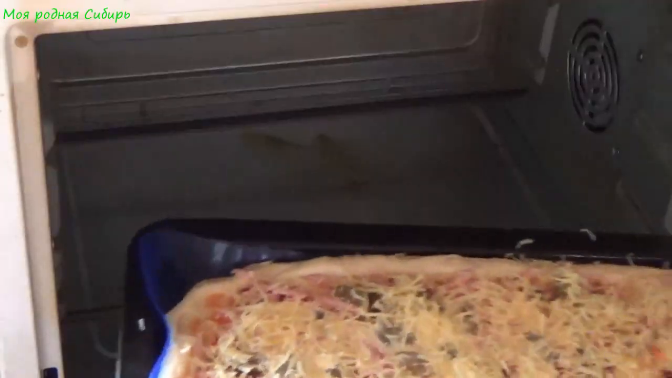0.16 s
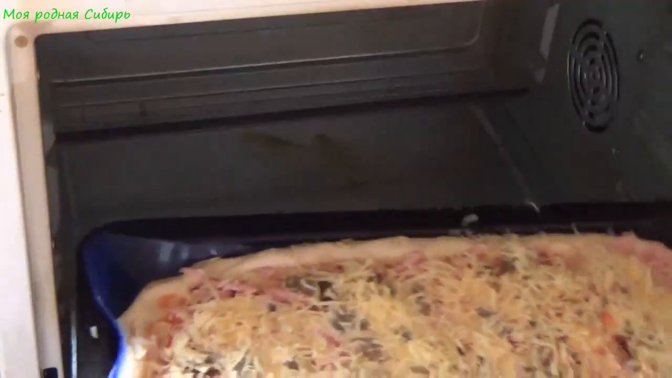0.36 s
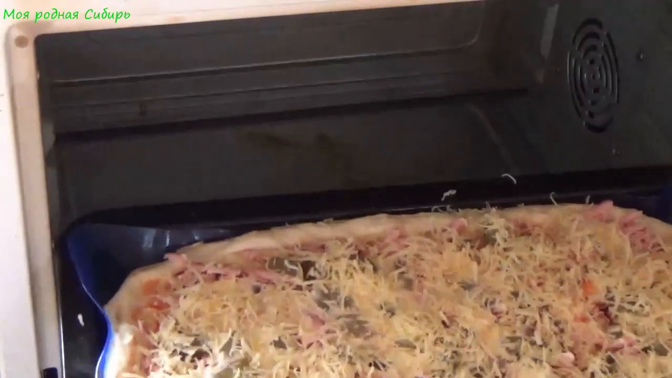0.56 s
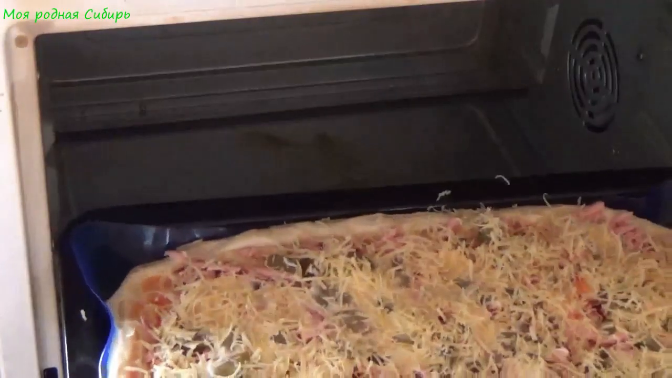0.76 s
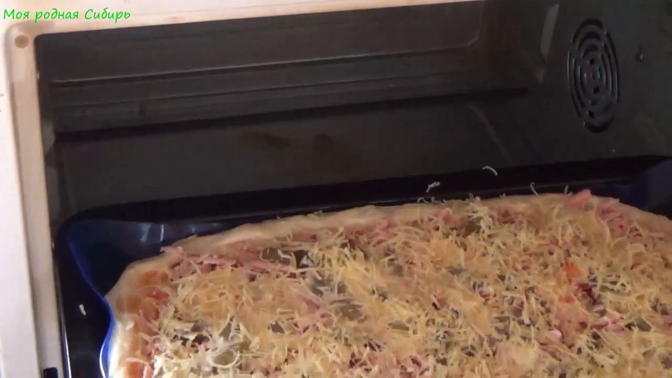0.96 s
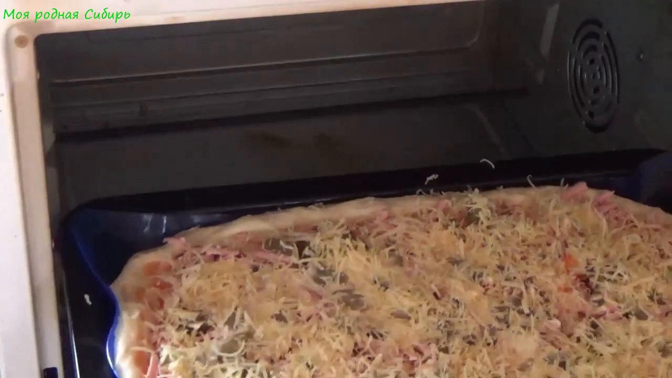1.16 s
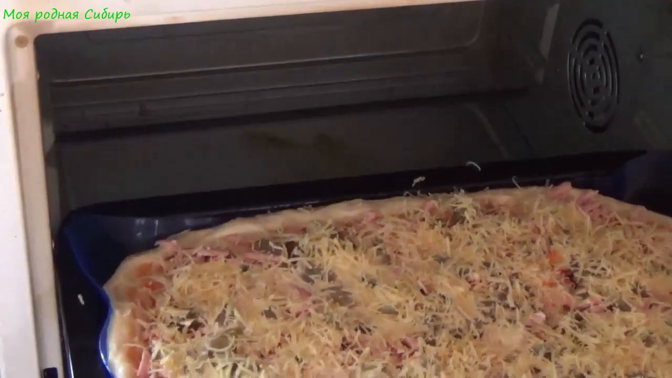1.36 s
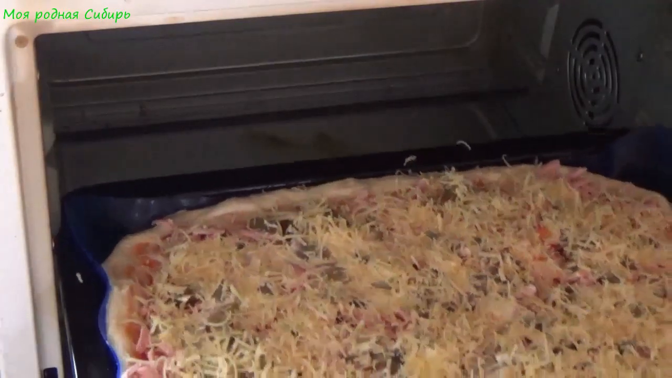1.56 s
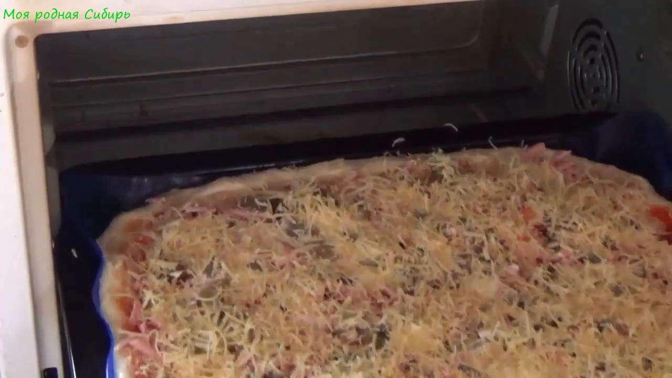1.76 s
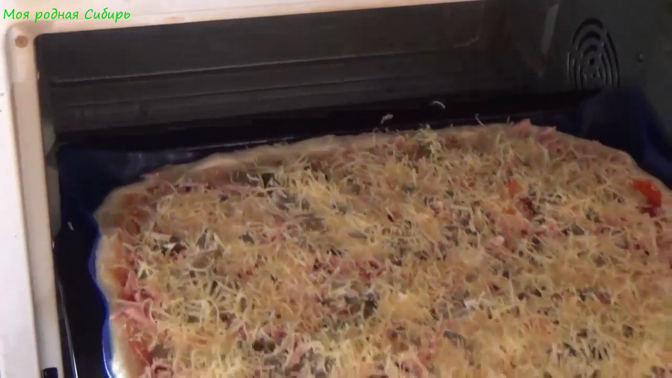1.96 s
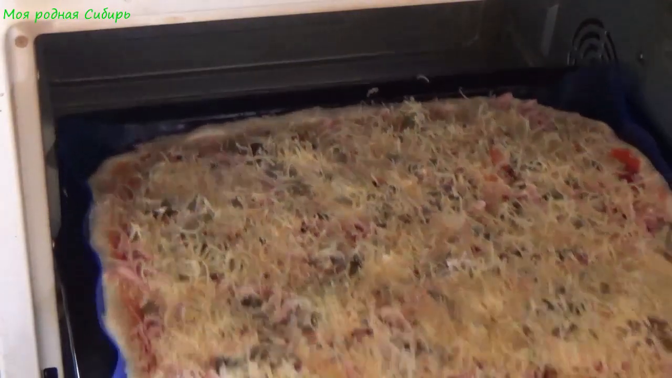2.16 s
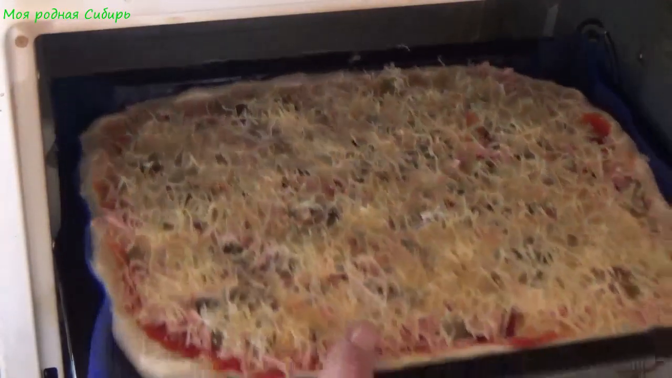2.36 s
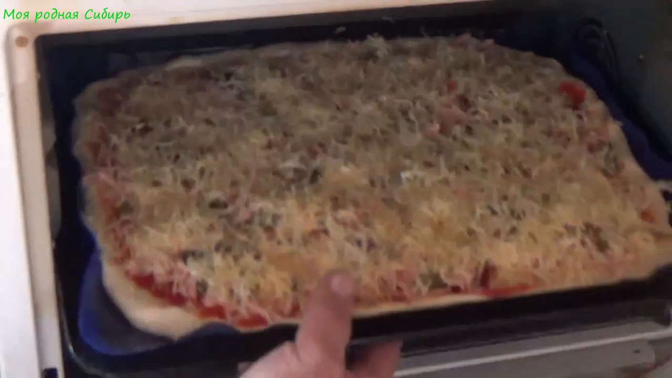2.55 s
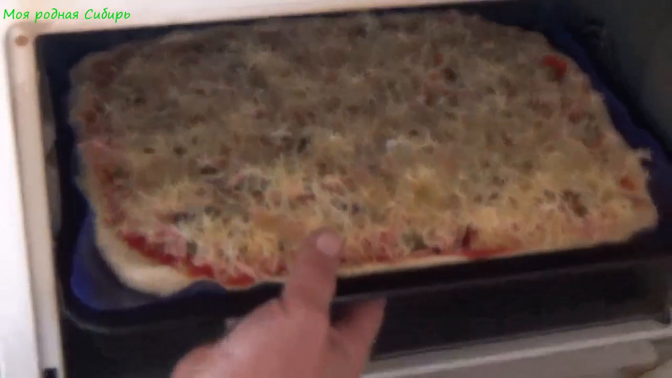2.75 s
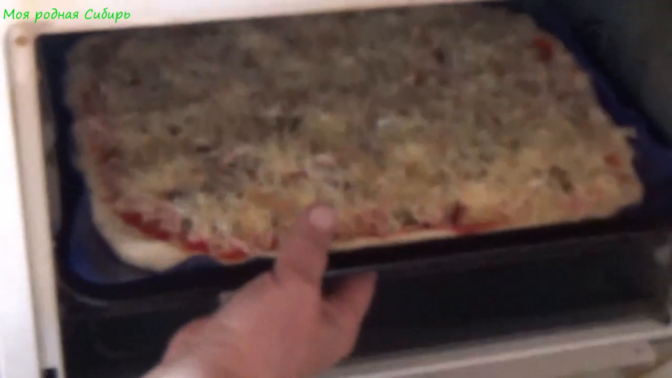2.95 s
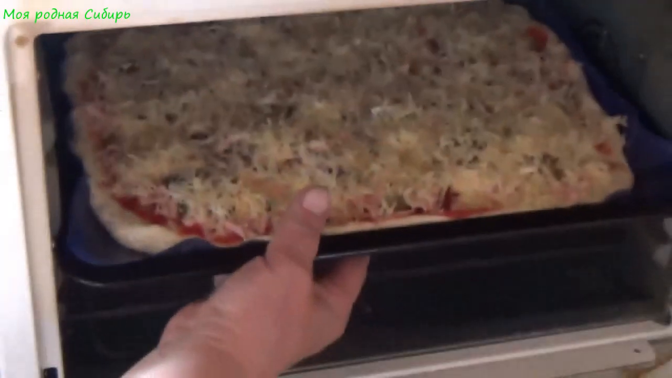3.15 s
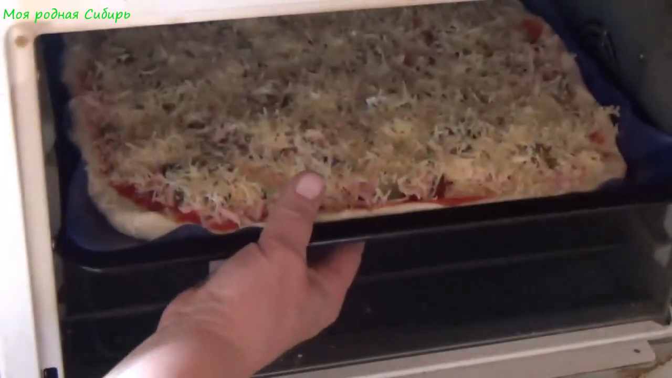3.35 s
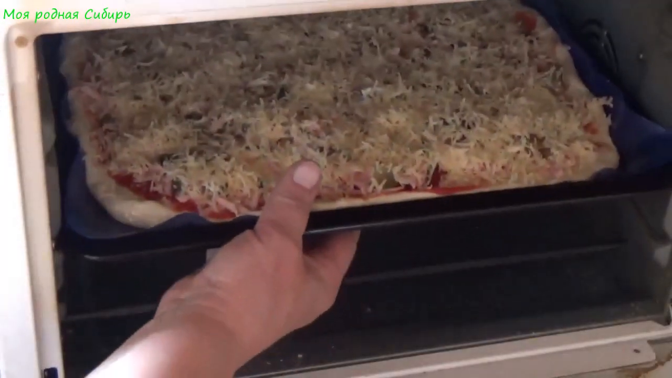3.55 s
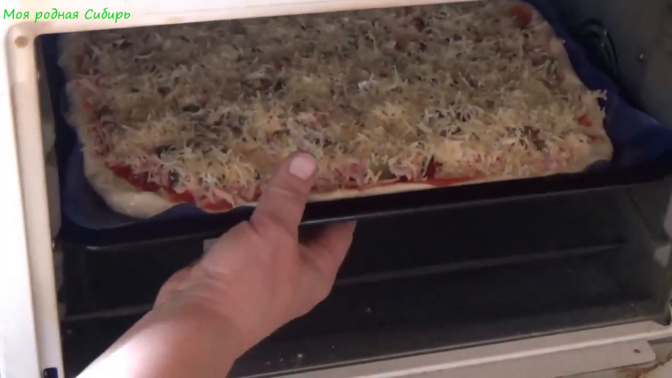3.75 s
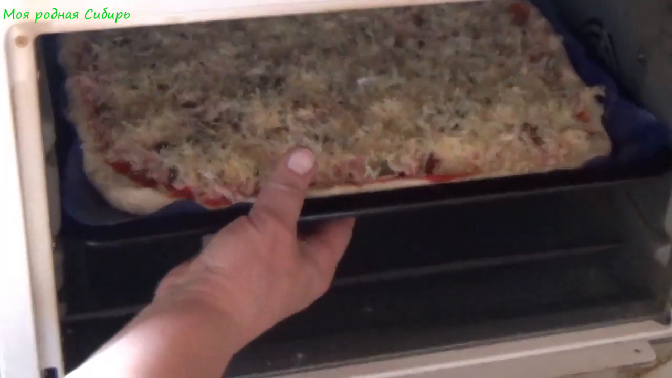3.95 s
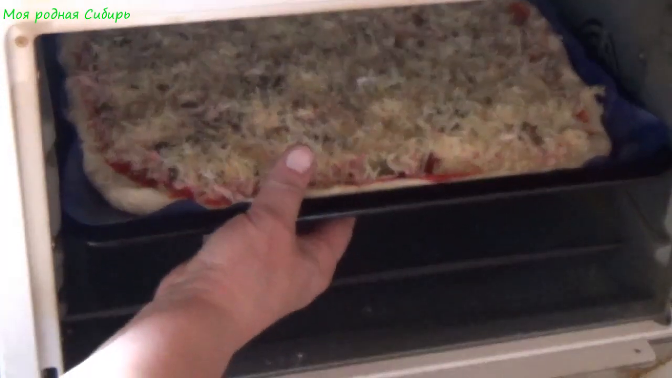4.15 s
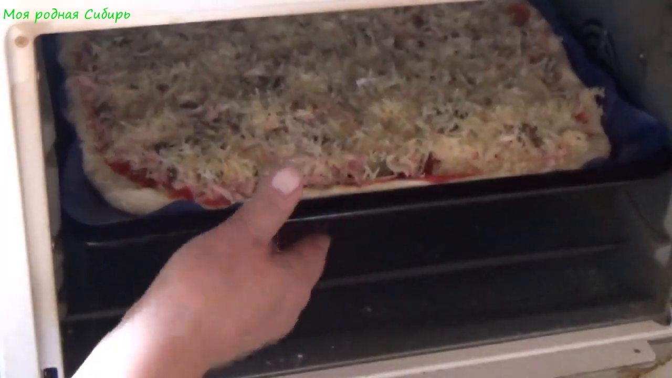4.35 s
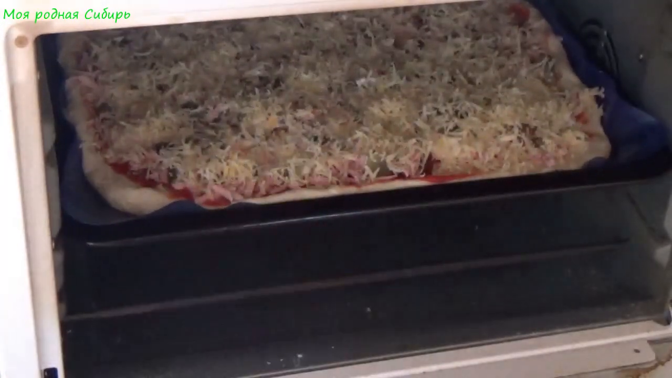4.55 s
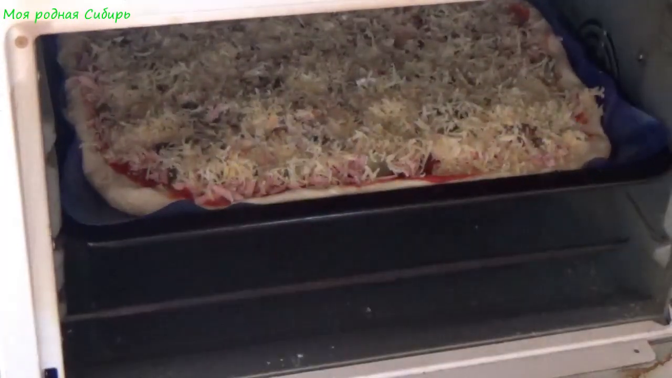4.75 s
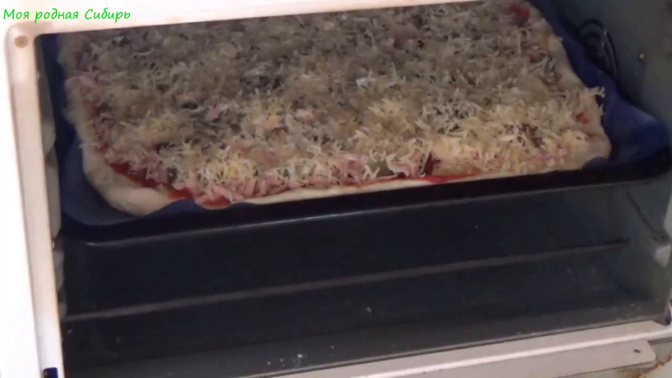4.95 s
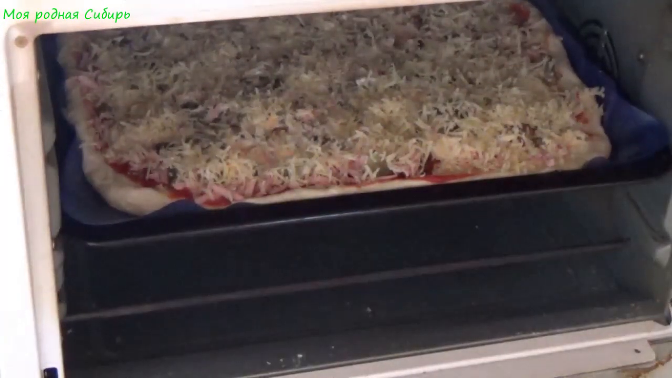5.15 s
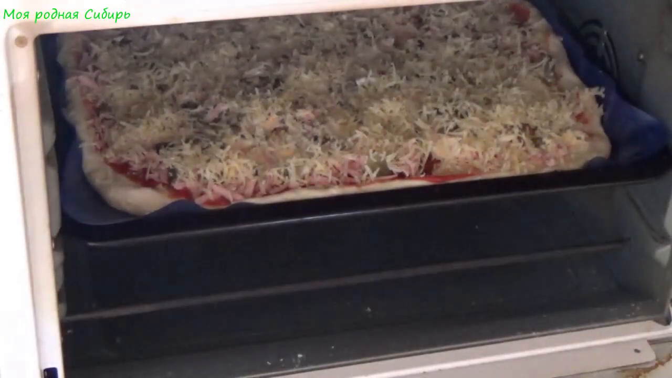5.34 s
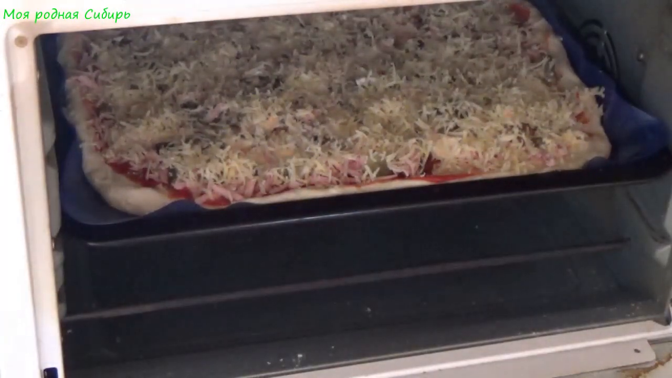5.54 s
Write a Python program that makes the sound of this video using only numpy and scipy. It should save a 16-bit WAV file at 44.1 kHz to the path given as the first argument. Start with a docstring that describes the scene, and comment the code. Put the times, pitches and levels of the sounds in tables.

```python
"""Home kitchen, stereo microphone close by, a small oven nearly straight ahead. Room noise and a faint whine
of narrow noise bands run throughout; finger ticks come first. A loaded steel tray then knocks on the side rails:
blows ring its modes and a crowd of filtered noise, some sing or wobble in pitch. Shoves, thin squeaks and a long
push follow, random catches ringing the tray and rails ever more gently. It bumps the back, cabinet modes sounding
softly; the hand slips off in a swell of noise with a tick, and the whine is left hanging in the room."""
import sys
import numpy as np
from scipy import signal
from scipy.fft import rfft, irfft, next_fast_len
from scipy.io import wavfile

SR = 44100
rng = np.random.default_rng(int(sys.argv[2]) if len(sys.argv) > 2 else 0)


def transcribe(signal):
    """Save signal, clipped to [-1, 1], as a 16-bit WAV file at the path in sys.argv[1]."""
    frames = np.atleast_2d(signal).T
    limited = np.clip(frames, -1, 1)
    pcm = np.round(limited * 32767).astype(np.int16)
    wavfile.write(sys.argv[1], SR, pcm)


N = 246365
TIME = np.arange(N) / SR  # s
THIRDS_HZ = 45 * 2 ** (np.arange(25) / 3)  # centres of the third octaves


def from_db(db):
    """Decibels to amplitude gain."""
    return 10 ** (np.asarray(db) / 20)


def rms_one(x):
    """Scale to rms 1."""
    return x / np.sqrt(np.mean(x ** 2) + 1e-20)


def at_hz(points, hz):
    """Read a table of (Hz, value) on a log-frequency axis."""
    known_hz, values = np.transpose(points)
    return np.interp(np.log(np.maximum(hz, 1)), np.log(known_hz), values)


def fade(t, t60):
    """Exponential decay, down 60 dB after t60 seconds."""
    return np.exp(-np.log(1000) * t / t60)


def add(track, start_s, sound):
    """Mix a sound into a track at a given time."""
    start = max(round(start_s * SR), 0)
    track[start:start + len(sound)] += sound[:N - start]


def coloured(x, spectrum):
    """Filter a steady signal by a table of (Hz, dB), then scale to rms 1."""
    size = next_fast_len(len(x))
    gain = from_db(at_hz(spectrum, np.fft.rfftfreq(size, 1 / SR)))
    return rms_one(irfft(rfft(x, size) * gain, size)[:len(x)])


def drift(per_s):
    """Random wander through per_s new values a second, rms 1."""
    knots = rng.standard_normal(N // 20)
    return rms_one(np.interp(TIME * per_s, np.arange(len(knots)), knots))


def resonate(x, hz, t60):
    """Two-pole resonance, about gain 1 at its peak."""
    r = fade(1 / SR, t60)
    feedback = [1, -2 * r * np.cos(2 * np.pi * hz / SR), r * r]
    return signal.lfilter([(1 - r * r) / 2, 0, (r * r - 1) / 2], feedback, x)


def narrow_noise(size, hz, t60):
    """Noise through the same resonance twice: a wavering tone, rms 1."""
    once = resonate(rng.standard_normal(size), hz, t60)
    return rms_one(resonate(once, hz, t60))


def decaying_sine(t, hz, t60):
    """One struck mode: a sine that dies away exponentially."""
    return np.sin(2 * np.pi * hz * t) * fade(t, t60)


# The kitchen at rest. Each row: frequency in Hz, relative density in dB per Hz.
ROOM_COLOUR = [(15, -59), (25, -14), (87, 2), (165, 1), (207, 0.5), (311, 3.5), (401, 0.5), (573, -7.5),
               (954, -3.5), (1030, -1.5), (1470, -9), (1590, -9.5), (1950, -11.5), (5970, -13.5),
               (11000, -18), (14300, -106), (22000, -120)]
# Room noise heard at the microphone, swelling a little near the end. Each row: time in seconds, level in dB.
ROOM_LEVEL = [(0, -52), (4.95, -52.5), (5.35, -50.5)]
# The faint whine in the room. Each row: frequency in Hz, level in dB.
WHINE_TONES = [(220.7, -62.5), (769.8, -70), (899.0, -76), (1028, -62), (1157, -95), (1545, -62.5)]


def room_tone(whine_t60=0.06):
    """Broad room noise with a few wavering tones of narrow noise, as of a small motor."""
    level = from_db(np.interp(TIME, *np.transpose(ROOM_LEVEL)))
    air = level * coloured(rng.standard_normal(N), ROOM_COLOUR)
    whine = sum(from_db(db) * narrow_noise(N, hz, whine_t60) for hz, db in WHINE_TONES)
    return air + whine


# Dry ticks: small ones of fingers on the tray, hard ones of its corner on a rail.
# Each row: start in seconds, relative level in dB.
TICKS = [(0.105, -43), (0.197, -37), (0.883, -7), (1.253, -27), (1.408, -8), (1.944, -22), (4.258, -35),
         (4.338, -12)]
# Colour of a tick, and of skin on the rim. Each row: frequency in Hz, relative density in dB per Hz.
TICK_COLOUR = [(300, -14), (1400, -8), (2500, -2.5), (4000, -6), (6000, 1.5), (8000, -1), (11000, 1)]
TICK_T60 = 0.004  # s


def ticks(echo_db=-24, echo_t60=0.033):
    """A hard point contact gives a few milliseconds of noise, with a faint longer tail as its echo."""
    t, out = TIME[:SR // 4], np.zeros(N)
    shape = fade(t, TICK_T60) + from_db(echo_db) * fade(t, echo_t60)
    for start_s, db in TICKS:
        add(out, start_s, from_db(db) * shape * coloured(rng.standard_normal(len(t)), TICK_COLOUR))
    return out


def third_octave_noise(size):
    """A row of noise for each third octave, each rms 1."""
    rows = []
    for edges in THIRDS_HZ[:, None] * 2 ** (np.array([-1, 1]) / 6):
        band = signal.butter(2, edges, "band", fs=SR, output="sos")
        rows.append(rms_one(signal.sosfilt(band, rng.standard_normal(size))))
    return np.array(rows)


# The tray knocking on the rails. Each row: start in seconds, relative strength in dB, weight in the lows in dB,
# hardness in the treble in dB, the spot that is struck, relative level of its singing in dB.
KNOCKS = [(0.641, -12, 0.5, -8.5, "sheet", -20.5), (0.884, -5, -1.5, -17.5, "sheet", -16),
          (1.062, -10.5, -0.5, -14.5, "rim", -21), (1.131, -13.5, 4.5, -21, "rail", -8),
          (1.155, -10.5, 1, -16, "sheet", -46), (1.346, -7.5, -1.5, -13, "rail", -7.5),
          (1.411, -12, 2.5, -5.5, "rim", -39), (1.451, -10, -5.5, -7.5, "rim", -21),
          (1.551, -23, 2, -29, "sheet", -36), (1.707, -21.5, 10, -21, "rail", -15.5),
          (1.749, -18.5, -5, -29, "rail", -14.5), (1.811, -13, -1.5, -38, "sheet", -35),
          (1.944, -10.5, 1.5, -21, "sheet", -36), (2.4, -20, -12, -35, "sheet", -38),
          (2.556, -13, 1, -20.5, "rim", -34), (2.611, -8.5, -9, -16, "rail", -6.5),
          (2.805, -15.5, 2, -26, "rail", -14.5), (3.324, -36, 13, -33, "rail", -40)]
# Strongest modes of the tray on its rails. Each row: frequency in Hz, relative level in dB, t60 in seconds.
TRAY_MODES = [(72.1, -8, 0.92), (191, -12, 0.97), (261.6, -15, 0.72), (299, -12.5, 0.27), (353.4, -9, 0.55),
              (397.4, -9, 0.32), (484.6, -16.5, 0.87), (513, -42, 0.15), (570, -20, 1.1),
              (641, -10.5, 0.49), (739, -24, 0.32), (795, -17, 0.45), (955, -23.5, 0.45), (1045, -19, 0.61),
              (1406, -20, 0.54), (1696, -15, 0.3), (1997, -19, 0.55), (2203, -16, 0.29),
              (2675, -12.5, 0.18), (2750, -27, 0.23), (3507, -4.5, 0.13), (3640, -27, 0.091),
              (4320, -6, 0.13), (6000, -16.5, 0.32)]
# Its crowd of weaker modes. Each row: frequency in Hz, relative level in dB per third octave.
TRAY_CROWD = [(45, -17), (80, -28), (125, -3.5), (250, -6), (450, -10.5), (630, -12), (800, -11),
              (1000, -16), (1300, -13), (2100, -9.5), (3000, -8.5), (4500, -9), (6000, -4), (8000, -8),
              (11000, -16)]
# Ring of tray, oven and kitchen together. Each row: frequency in Hz, t60 in seconds.
RING_T60 = [(100, 0.57), (260, 1.5), (700, 1.31), (1840, 0.51), (4850, 0.33), (10000, 0.066)]
# Colour of a blow, by the spot that is struck. Each row: frequency in Hz, relative level in dB.
SPOT_COLOUR = {"sheet": [(85, -22), (220, -7), (450, -7.5), (1500, -0.5), (4200, 0), (8000, -2)],
               "rim": [(85, -19.5), (220, -10.5), (450, -0.5), (1500, 1), (4200, 2), (8000, -7)],
               "rail": [(85, -17), (220, -20), (450, -2.5), (1500, -0.5), (4200, 0.5), (8000, -10.5)]}
# Time scale for a blow to spread through the tray, by spot, in seconds.
SWELL_S = {"sheet": 0.009, "rim": 0.003, "rail": 0.0035}
# weight acts fully below the first pitch, hardness above the last, neither at the middle one
WEIGHT_HZ, MIDDLE_HZ, HARDNESS_HZ = 450, 1460, 4140


def knocks(clash_t60=0.15, tail_db=-10, crowd_db=1, modes_db=-1, spread_db=1.0, alike=0.91,
           swell_hz=1000, crack_db=1, crack_t60=0.018):
    """Each knock sets off the tray's main modes and a dense clash of weak ones, which leaves a longer tail."""
    t, out = TIME[:SR], np.zeros(N)
    mode_hz, mode_db, mode_t60 = np.transpose(TRAY_MODES)
    rings = decaying_sine(t, mode_hz[:, None], mode_t60[:, None])
    signs = (-1) ** np.arange(len(mode_hz))
    tail = from_db(tail_db) * fade(t, at_hz(RING_T60, THIRDS_HZ)[:, None])
    crowd_fade = np.hypot(fade(t, clash_t60), tail)
    noise = third_octave_noise(size=4 * SR)
    onset = t[:SR // 10]
    crack = from_db(crack_db) * fade(onset, crack_t60) * (THIRDS_HZ[:, None] > 2500)
    for start_s, strength_db, weight_db, hardness_db, spot, _ in KNOCKS:
        tilt = [(WEIGHT_HZ, weight_db), (MIDDLE_HZ, 0), (HARDNESS_HZ, hardness_db)]
        blow = [(hz, strength_db + db + at_hz(tilt, hz)) for hz, db in SPOT_COLOUR[spot]]
        # the point of contact moves, so only part of the ring is the same each time
        first = rng.integers(SR, 2 * SR)
        shared, fresh = noise[:, -SR:], noise[:, first:first + SR]
        crowd = (np.sqrt(alike) * shared + np.sqrt(1 - alike) * fresh) * crowd_fade
        # bending waves cross the sheet faster in the treble: it cracks at once, the lows build up later
        rise_s = SWELL_S[spot] * np.sqrt(swell_hz / (THIRDS_HZ[:, None] + swell_hz / 2))
        crowd[:, :len(onset)] *= 1 - np.exp(-onset / rise_s) + crack
        chance_db = spread_db * rng.standard_normal(len(mode_hz))
        strengths = from_db(modes_db + mode_db + at_hz(blow, mode_hz) + chance_db)
        main = (strengths * signs) @ rings * (1 - np.exp(-t / SWELL_S[spot]))
        crowd_gain = from_db(crowd_db + at_hz(TRAY_CROWD, THIRDS_HZ) + at_hz(blow, THIRDS_HZ))
        add(out, start_s, main + crowd_gain @ crowd)
    return out


# Modes that sing out at each spot. Each row: frequency in Hz, relative level in dB, t60 in seconds.
SPOT_MODES = {"sheet": [(258.7, -1.5, 1), (230, -10.5, 1)], "rim": [(645, 9.5, 0.094), (1103, 0.5, 0.19),
              (2020, -1, 0.32), (3450, -10, 0.22)], "rail": [(376.4, 0.5, 0.11), (397, -10.5, 0.44),
              (516.6, -10, 0.12), (581, -7.5, 0.089), (2044, -22.5, 0.37)]}


def singing(rise_s=0.0042):
    """A blow also rings a few modes of its spot: sheet booms, hollow rail clunks, rim pings."""
    t, out = TIME[:SR], np.zeros(N)
    for start_s, *_, spot, singing_db in KNOCKS:
        ring = sum(from_db(db) * decaying_sine(t, hz, t60) for hz, db, t60 in SPOT_MODES[spot])
        add(out, start_s, from_db(singing_db) * np.sqrt(2) * ring * (1 - np.exp(-t / rise_s)))
    return out


# The loaded sheet wobbling, its pitch sliding as it bends.
# Each row: start in seconds, relative level in dB, first pitch in Hz, last pitch in Hz, length in seconds.
WOBBLES = [(0.982, -26.5, 200.3, 186, 0.1), (2.31, -48, 271, 173, 0.084), (2.81, -34, 129, 254, 0.096)]


def wobbles():
    """Bending changes the tension of the sheet, and with it the pitch of its lowest ring."""
    out = np.zeros(N)
    for start_s, db, first_hz, last_hz, length_s in WOBBLES:
        progress = np.linspace(0, 1, round(length_s * SR))
        phase = 2 * np.pi * np.cumsum(first_hz + (last_hz - first_hz) * progress) / SR
        swell = np.sin(np.pi * progress)
        add(out, start_s, from_db(db) * np.sqrt(2) * swell * np.sin(phase))
    return out


# Short shoves that work the tray onto the rails. Each row: start in seconds, length in seconds, effort in dB.
SHOVES = [(1.123, 0.034, 3), (1.246, 0.13, -3.5), (1.423, 0.037, 2.5), (1.548, 0.025, -16),
          (1.613, 0.045, -16), (1.687, 0.093, -5.5), (1.797, 0.036, -3.5), (1.964, 0.036, -7),
          (2.043, 0.08, -8.5)]
# Then one long push, easing off as the tray goes home. Each row: time in seconds, effort in dB.
PUSH = [(2.18, -4), (2.3, 0.5), (2.42, 2), (2.53, -1.5), (2.7, -0.5), (2.96, -9), (3.17, -11), (3.5, -16.5),
        (3.8, -21.5), (3.91, -29.5), (3.97, -52)]
SHOVE_SAG_DB_PER_S = 16  # each shove spends itself


def effort():
    """How hard the tray is driven along the rails, as a gain: a few shoves, then the long push."""
    drive = from_db(np.interp(TIME, *np.transpose(PUSH), left=-np.inf, right=-np.inf))
    for start_s, length_s, db in SHOVES:
        sag_db = SHOVE_SAG_DB_PER_S * TIME[:round(length_s * SR)]
        add(drive, start_s, from_db(db - sag_db))
    return drive


def held_over(gain, t60):
    """Follow a gain upwards at once, and downwards no faster than a ring dies."""
    fall = np.log(1000) * TIME / t60
    return np.exp(np.maximum.accumulate(np.log(gain + 1e-12) + fall) - fall)


PUSH_ATTACK_S = 0.002  # time constant


def driven(drive, level_db, follows, release_t60):
    """Gain of one part of the friction: it follows a share of the effort's swing in dB, and rings on after it."""
    r = np.exp(-1 / (PUSH_ATTACK_S * SR))
    return from_db(level_db) * signal.lfilter([1 - r], [1, -r], held_over(drive ** follows, release_t60))


def friction(spectrum, modes, catches_per_s, uneven_db, ring_db, smear_t60, wander_per_s=20, direct_db=-2):
    """Tiny catches of enamel on steel sound at once, spread through the sheet and ring the modes; rms 1."""
    happens = rng.random(N) < catches_per_s / SR
    catches = happens * rng.standard_normal(N) * from_db(uneven_db * drift(per_s=70))
    t = TIME[:SR // 4]
    # the contact wanders between eight spots on the rim, each with a ring of its own
    shares = np.array([np.exp(drift(wander_per_s)) for spot in range(8)])
    shares /= np.linalg.norm(shares, axis=0)
    smeared = np.zeros(N)
    for share in shares:
        spot_ring = rng.standard_normal(len(t)) * fade(t, smear_t60)
        smeared += signal.oaconvolve(catches * share, spot_ring)[:N]
    spread = from_db(direct_db) * rms_one(catches) + rms_one(smeared)
    ringing = sum(resonate(spread, mode[0], mode[-1]) for mode in modes)
    return coloured(spread + from_db(ring_db) * ringing, spectrum)


# Low rumble of the cabinet under the sliding tray. Each row: frequency in Hz, relative density in dB per Hz.
RUMBLE_COLOUR = [(20, -23), (45, -9), (75, 3), (110, -6.5), (170, -4), (300, -27.5)]
# Colour of the low judder. Each row: frequency in Hz, relative density in dB per Hz.
JUDDER_COLOUR = [(35, -34), (72, -33), (100, -27.5), (160, -3.5), (260, -0.5), (320, -5), (400, 3),
                 (500, -5.5), (560, -4), (700, -3), (1000, -35.5)]
# Colour of the grinding in the middle. Each row: frequency in Hz, relative density in dB per Hz.
GRIND_COLOUR = [(450, -34), (780, 5.5), (1030, 3.5), (1200, 2), (1400, 2.5), (2000, -2), (2750, -4),
                (3150, -9.5), (4200, -15), (6000, -16), (7500, -41)]
# Colour of the hiss on top. Each row: frequency in Hz, relative density in dB per Hz.
HISS_COLOUR = [(2000, -13), (3500, -3.5), (4900, 0.5), (6000, 2.5), (7400, 2.5), (9500, 1.5), (11500, -5)]
# Bright resonances of the rails that colour the scrape. Each row: frequency in Hz, t60 in seconds.
RAIL_MODES = [(3500, 0.0045), (6050, 0.00087), (9800, 0.0017)]


def slide():
    """The sliding tray rumbles, judders, grinds and hisses; the grinding depends most on the effort."""
    drive = effort()
    rumble = driven(drive, level_db=-47.5, follows=0.14, release_t60=0.68)
    judder = driven(drive, level_db=-24.5, follows=0.85, release_t60=1.4)
    grind = driven(drive, level_db=-26.5, follows=0.98, release_t60=0.43)
    hiss = driven(drive, level_db=-36.5, follows=0.54, release_t60=0.08)
    return (rumble * coloured(rng.standard_normal(N), RUMBLE_COLOUR)
            + judder * friction(JUDDER_COLOUR, TRAY_MODES, catches_per_s=6000, uneven_db=0.5,
                                ring_db=0.5, smear_t60=0.16)
            + grind * friction(GRIND_COLOUR, TRAY_MODES, catches_per_s=7000, uneven_db=-1.0,
                               ring_db=-8.5, smear_t60=0.042)
            + hiss * friction(HISS_COLOUR, RAIL_MODES, catches_per_s=7000, uneven_db=1.5,
                              ring_db=-1, smear_t60=0.059))


# The rim sticking and slipping in brief thin squeaks.
# Each row: start in seconds, relative level in dB, frequency in Hz, length in seconds.
SQUEAKS = [(1.277, -44, 8160, 0.094), (1.597, -48, 9800, 0.1), (1.733, -48, 7200, 0.079),
           (2.057, -46, 4280, 0.047), (2.236, -41, 6060, .13), (2.25, -40, 5360, 0.073)]


def squeaks(t60=0.033):
    """Each squeak swells and dies as noise in one narrow resonance of a rail."""
    out = np.zeros(N)
    for start_s, db, hz, length_s in SQUEAKS:
        swell = np.hanning(round(length_s * SR))
        tone = narrow_noise(SR, hz, t60)
        add(out, start_s, from_db(db) * swell * tone[-len(swell):])
    return out


# Soft bumps against the oven cabinet. Each row: start in seconds, relative level in dB, low-pass corner in Hz.
BUMPS = [(3.957, -30.5, 600), (4.307, -32.5, 405), (4.338, -34, 159)]
# Modes of the cabinet. Each row: frequency in Hz, relative level in dB, t60 in seconds.
CABINET_MODES = [(101, -8, 0.63), (134, -15, 1.2), (191.3, -8.5, 0.5), (234, -6, 1), (298, -18, 2.1),
                 (363.6, -3.5, 0.85), (413, -20, 0.84), (496, -30, 0.34), (554, -10, 0.9),
                 (620, -10.5, 0.54), (857, -20, 0.48), (1066, -12.5, 0.36)]


def bumps(boom_db=-7, boom_t60=1.0, rise_s=0.0015):
    """Soft blows reach mostly the low modes of the cabinet, and the oven cavity booms with them."""
    t, out = TIME[:SR], np.zeros(N)
    boom_colour = [(40, -17), (100, 2), (400, -1), (700, -3.0), (1500, -23), (4000, -40)]  # Hz, relative dB
    modes = np.zeros(SR)
    for k, (hz, db, t60) in enumerate(CABINET_MODES):
        modes += from_db(db) * decaying_sine(t, hz, t60) * (-1) ** k
    for start_s, db, soft_hz in BUMPS:
        boom = coloured(rng.standard_normal(SR), boom_colour) * fade(t, boom_t60)
        sound = (modes + from_db(boom_db) * boom) * (1 - np.exp(-t / rise_s))
        soften = signal.butter(1, soft_hz, fs=SR, output="sos")
        add(out, start_s, from_db(db) * signal.sosfilt(soften, sound))
    return out


SLIP_S, SLIP_DB = 4.342, -31.5  # moment of release, level there
SLIP_BUILD_T60, SLIP_RELEASE_T60 = 0.23, 0.022  # s, to build up and to die away


def hand():
    """Skin rubs over the rim as noise that grows ever louder until the hand lets go."""
    build = fade(np.maximum(SLIP_S - TIME, 0), SLIP_BUILD_T60)
    release = fade(np.maximum(TIME - SLIP_S, 0), SLIP_RELEASE_T60)
    return from_db(SLIP_DB) * build * release * coloured(rng.standard_normal(N), TICK_COLOUR)


# Stereo width of the echoes. Each row: frequency in Hz, side minus mid in dB.
WIDTH = [(60, -10), (125, -17.5), (250, -17), (500, -18.5), (1000, -18), (2000, -17), (4000, -15.5),
         (10000, -12)]


def reflections(mid, t60=0.025, kitchen_db=-12, kitchen_t60=0.083, delay_s=0.0033):
    """Quick echoes off the oven and longer ones off the kitchen walls, as the stereo side signal."""
    t = TIME[:SR // 3]
    decay = fade(t, t60) + from_db(kitchen_db) * fade(t, kitchen_t60)
    echoes = rfft(rng.standard_normal(len(t)) * (t > delay_s) * decay)
    echoes /= np.sqrt(np.mean(abs(echoes) ** 2))
    echoes = echoes * from_db(at_hz(WIDTH, np.fft.rfftfreq(len(t), 1 / SR)))
    return signal.fftconvolve(mid, irfft(echoes))[:N]


# Stereo balance in the lows, mostly to the left. Each row: frequency in Hz, left minus right in dB.
LEAN = [(80, -0.5), (125, 3), (190, 2.2), (500, 0)]


def scene():
    """Everything happens nearly straight ahead, close by."""
    clatter = knocks() + singing() + wobbles() + ticks() + bumps()
    mid = clatter + slide() + squeaks() + hand() + room_tone()
    side = reflections(mid)
    size = next_fast_len(N + SR)
    lean_db = at_hz(LEAN, np.fft.rfftfreq(size, 1 / SR))
    lean = from_db(lean_db * np.array([[1], [-1]]) / 2)  # half to each channel
    return irfft(rfft([mid + side, mid - side], size) * lean, size)[:, :N]


CUTOFF_HZ = 11100


def record(dry):
    """At the microphone peaks are rounded and the treble above the cutoff is removed."""
    rounded = 0.83 * np.tanh(dry / 0.96)
    return signal.sosfilt(signal.ellip(12, .1, 80, CUTOFF_HZ, fs=SR, output="sos"), rounded)


dry = scene()
out = record(dry)
transcribe(out)
```